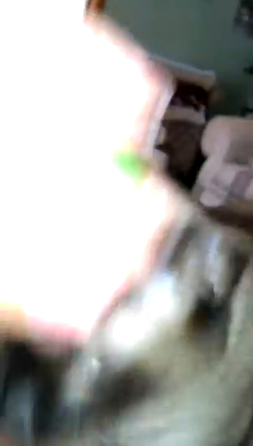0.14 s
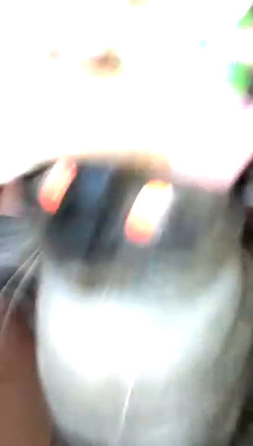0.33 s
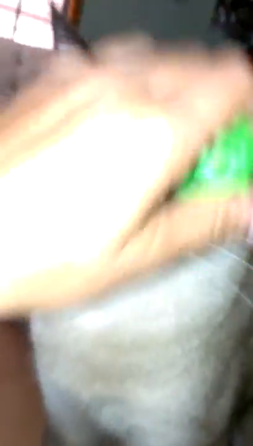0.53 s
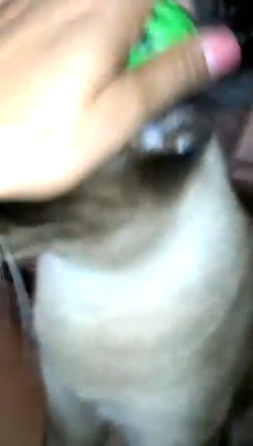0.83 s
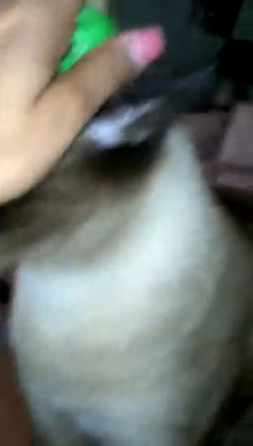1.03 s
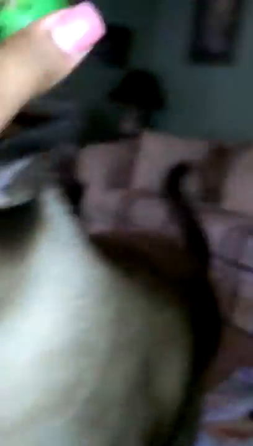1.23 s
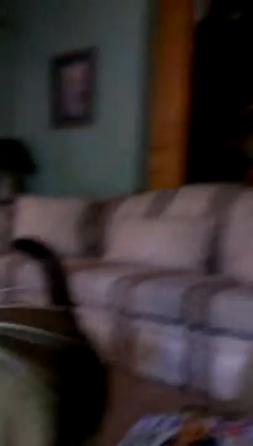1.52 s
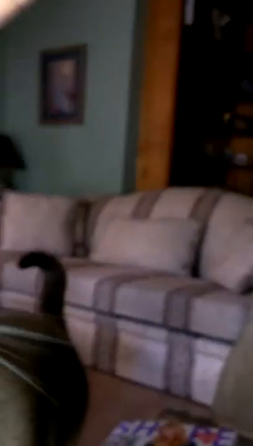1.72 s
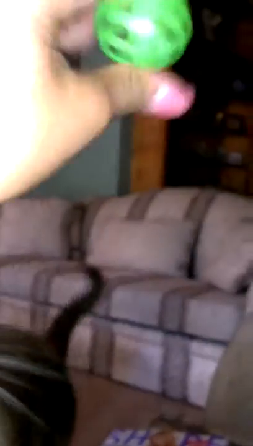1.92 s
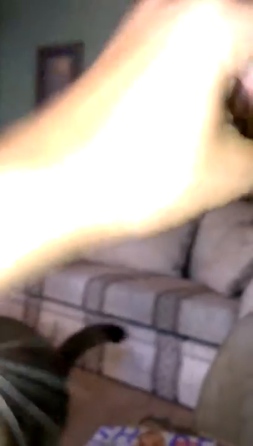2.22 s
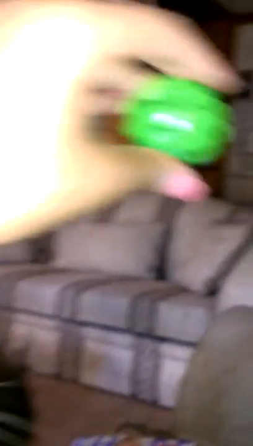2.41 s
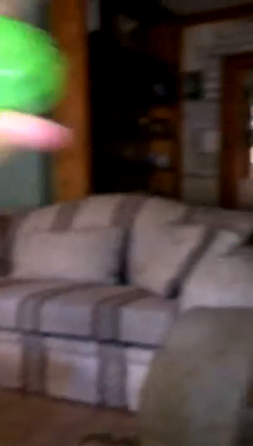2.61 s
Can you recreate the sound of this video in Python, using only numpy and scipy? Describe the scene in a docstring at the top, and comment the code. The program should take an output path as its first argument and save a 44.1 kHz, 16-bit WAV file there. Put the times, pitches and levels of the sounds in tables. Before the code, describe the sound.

A small damped bell in a hollow plastic ball jingles close by, sparse at first, then in denser, louder bursts with light plastic clicks, in a quiet furnished living room, picked up by a phone.

```python
"""A small bell loose inside a slotted plastic ball is shaken in bursts close to a phone in a quiet living room.
The pellet strikes the damped bell (short ringing modes and ticks) and small rattles fill the gaps.
The bell knocks and skids on the plastic shell (shell modes, ticks and sliding hiss).
A faint treble hiss flickers and uneven low noise swells and sinks through the shaking.
The room answers with a brief noise tail over a low room tone."""
import sys
import numpy as np
from scipy import signal
from scipy.fft import rfft, irfft
from scipy.io import wavfile

SR = 44100
rng = np.random.default_rng(int(sys.argv[2]) if len(sys.argv) > 2 else 0)


def voltage_ratio(decibels):
    """Convert decibels (scalar or array-like) to amplitude ratios, 20 dB per decade."""
    exponent = np.asarray(decibels, float) / 20
    return 10 ** exponent


def int16_out(signal):
    """Quantize to a 16-bit WAV file."""
    q = np.round(np.clip(np.atleast_2d(signal).T, -1, 1) * 32767)
    wavfile.write(sys.argv[1], SR, q.astype(np.int16))


N = 121275  # length in samples

# settings shared by several layers
BELL_FAVOUR_HZ, BELL_DETUNE = 260, 0.0051  # width of a blow's favour; relative scatter of the modes
SHELL_FAVOUR_HZ, SHELL_DETUNE, SHELL_T60_S = 890, 0.03, 0.0079
STRIKE_HOLD_S, STRIKE_LEAD_S = 0.017, 0.0026  # how the stir of the strikes fades and builds
KNOCK_HOLD_S, KNOCK_LEAD_S = 0.014, 0.0069  # the same for the knocks
LAYERS_UNTIL_S = 2.63  # chance contacts stop here and the treble hiss starts to fade


def level(x, db):
    """Scale to an rms level."""
    return x * voltage_ratio(db) / np.sqrt(np.mean(x ** 2))


def band(x, lo_hz, hi_hz):
    """Second-order band-pass."""
    return signal.sosfilt(signal.butter(2, [lo_hz, hi_hz], "band", fs=SR, output="sos"), x)


def ring(times, peak_db, modes, favoured_hz, width_hz, t60_s, detune):
    """Each blow rings all modes, those near its favoured pitch most, the weak ones most unevenly."""
    contact_s, favour_db, scatter_db = 0.00051, 13, 2
    out = np.zeros(N + SR)
    mode_hz, mode_db, ring_times = np.array(modes, float).T
    t = np.arange(SR // 25) / SR
    chance = rng.standard_normal((len(times), 2, len(mode_hz)))
    rise = 1 - np.exp(-(t / contact_s) ** 2)
    t60_s = np.broadcast_to(t60_s, len(times))
    for start, db, pitch, t60, (uneven, shift) in zip(times, peak_db, favoured_hz, t60_s, chance):
        scatter = scatter_db * uneven * (1 - mode_db / 20)
        favour = favour_db * np.exp(-((mode_hz - pitch) / width_hz) ** 2)
        gain = voltage_ratio(mode_db + scatter + favour)
        mode_t60 = np.clip(ring_times * t60, .002, 1)[:, None]
        fade = np.exp(-np.log(1000) * t / mode_t60)
        hz = (mode_hz * (1 + detune * shift))[:, None]
        blow = rise * (gain @ (fade * np.sin(2 * np.pi * hz * t)))
        i = max(int(start * SR), 0)
        out[i:i + len(t)] += blow * voltage_ratio(db) / np.abs(blow).max()
    return out[:N]


def ticks(times, db):
    """Broad short cracks of hard contact: treble noise in decaying puffs."""
    decay_s = 0.0011
    kicks = np.zeros(N)
    np.add.at(kicks, np.clip((times * SR).astype(int), 0, N - 1), voltage_ratio(db))
    puffs = signal.lfilter([1], [1, -np.exp(-1 / (decay_s * SR))], kicks)
    return puffs * band(rng.standard_normal(N), 7500, 12700)


def stir(table, hold_s, lead_s):
    """How strongly the ball is astir: the blows of a table, building over lead_s and fading over hold_s."""
    t = np.arange(-SR // 4, SR // 4 + 1) / SR
    blows = np.array(table).T
    power = np.bincount((blows[0] * SR).astype(int), voltage_ratio(2 * blows[1]), N)
    swell = np.exp(-2 * np.maximum(t / hold_s, -t / lead_s))
    return np.sqrt(np.abs(signal.fftconvolve(power, swell, "same")))


def chance_contacts(per_s, strength):
    """Random times, levels in dB that follow the strength, and a spare draw from 0 to 1."""
    spread_db = 2.5
    draws = rng.random((2500, 3))
    times = np.cumsum(-np.log(1 - draws[:, 0])) / per_s
    keep = times < min(LAYERS_UNTIL_S, N / SR)
    times, draws = times[keep], draws[keep]
    db = 20 * np.log10(strength[(times * SR).astype(int)] + 1e-9)
    return times, db - spread_db * np.log(1 - draws[:, 1]), draws[:, 2]


# strikes of the pellet on the bell: start_s [s], level_db [dB, peak of the ringing],
# pitch_hz [Hz, favoured by the strike], t60_s [s, ring left by the grip of the shell]
BELL_STRIKES = [(0.025, -19, 6530, 0.0022), (0.039, -33, 6150, 0.009), (0.053, -28.5, 6530, 0.0023),
                (0.1221, -35, 6900, 0.029), (0.1444, -25, 6700, 0.013), (0.1494, -20.5, 6550, 0.0036),
                (0.185, -34.5, 6940, 0.021), (0.2199, -19.5, 6690, 0.0095), (0.2442, -24, 6750, 0.012),
                (0.2512, -22, 6750, 0.0012), (0.2672, -15.5, 7130, 0.0045), (0.2837, -23, 6600, 0.003),
                (0.3264, -40, 6860, 0.0056), (0.4046, -29, 7080, 0.0091), (0.4325, -34.5, 6800, 0.0075),
                (0.4636, -13, 6780, 0.013), (0.472, -27, 6780, 0.014), (0.484, -33, 7900, 0.012),
                (0.4896, -13, 6700, 0.012), (0.494, -27, 6850, 0.0085), (0.5043, -23, 6800, 0.0084),
                (0.5603, -15.5, 6640, 0.016), (0.5652, -16, 7000, 0.004), (0.5981, -26.5, 6530, 0.011),
                (0.6324, -27, 7250, 0.019), (0.64, -22.5, 6800, 0.0098), (0.686, -33, 6680.0, 0.0034),
                (0.7742, -15, 6630, 0.0089), (0.832, -39.5, 6740, 0.069), (0.8694, -23, 7200, 0.0049),
                (0.874, -24.5, 6470, 0.0088), (0.8866, -17.5, 6600, 0.0044), (0.893, -18.5, 6700, 0.0068),
                (0.9013, -21, 6760, 0.0024), (0.961, -21.0, 6870.0, 0.0088), (0.972, -13, 7100, 0.0037),
                (0.9935, -21.5, 6560, 0.016), (1.001, -17.5, 7100, 0.0073), (1.0099, -16.5, 7100, 0.015),
                (1.0167, -21, 6800, 0.012), (1.0217, -12.5, 6780, 0.019), (1.0267, -18.5, 6770, 0.011),
                (1.0484, -17.5, 6760, 0.013), (1.056, -25, 6700, 0.011), (1.0906, -20, 6800, 0.015),
                (1.0954, -28, 6800, 0.023), (1.1131, -19.5, 6770, 0.025), (1.1159, -19.5, 7880, 0.016),
                (1.1248, -20, 6850, 0.017), (1.1319, -18.5, 6770.0, 0.011), (1.1405, -12.5, 6780, 0.013),
                (1.1485, -26, 6830, 0.01), (1.1596, -26, 6570, 0.038), (1.284, -33, 7000, 0.0087),
                (1.3075, -22, 7060, 0.019), (1.4132, -29.5, 6950, 0.021), (1.42, -33, 7070, 0.017),
                (1.4288, -28, 6900, 0.014), (1.5007, -25.5, 6660, 0.0014), (1.5328, -11, 7030, 0.015),
                (1.5358, -21, 6500, 0.015), (1.539, -24.5, 6760, 0.046), (1.562, -17, 6800, 0.012),
                (1.568, -8, 7230, 0.01), (1.6357, -15.5, 7050, 0.0071), (1.6556, -13, 7040, 0.012),
                (1.67, -19, 7500, 0.0086), (1.6793, -28, 7000, 0.018), (1.6863, -15, 7100, 0.017),
                (1.7177, -20.5, 6800, 0.016), (1.7223, -11, 6670, 0.013), (1.7567, -17, 7140, 0.0064),
                (1.779, -17, 7100, 0.011), (1.7836, -11.5, 7060, 0.018), (1.7877, -12.5, 7000, 0.015),
                (1.8083, -19.5, 7150, 0.011), (1.826, -23.5, 7000, 0.0099), (1.8631, -26.5, 7050, 0.023),
                (1.8952, -9, 6960, 0.0088), (1.899, -14.5, 6940.0, 0.012), (1.9064, -17, 7140, 0.0065),
                (1.9368, -17, 6780, 0.023), (1.9512, -13, 7330, 0.012), (1.9602, -24.5, 6920.0, 0.0084),
                (1.964, -12.5, 7040, 0.0093), (1.9709, -8, 6930, 0.01), (1.987, -17, 6660, 0.051),
                (2.008, -18.5, 6980, 0.022), (2.0213, -26, 6740, 0.019), (2.092, -20, 6740, 0.014),
                (2.1112, -15.5, 6700, 0.013), (2.121, -12.5, 6840, 0.015), (2.1252, -21, 6800, 0.011),
                (2.137, -23.5, 6660, 0.048), (2.1435, -16, 6770.0, 0.016), (2.1566, -20, 6600, 0.043),
                (2.1711, -18, 6560, 0.026), (2.192, -25.5, 7100, 0.037), (2.2046, -11.5, 6400, 0.0011),
                (2.2067, -28, 6570, 0.0094), (2.2165, -18.5, 6800, 0.0076), (2.2192, -25, 6550, 0.021),
                (2.2295, -17.5, 7000.0, 0.0071), (2.2364, -24, 7260, 0.0026), (2.2697, -33, 7080.0, 0.029),
                (2.3109, -30, 7340, 0.0052), (2.335, -20, 7210, 0.011), (2.3806, -13, 8030, 0.0086),
                (2.385, -26.5, 6880.0, 0.022), (2.4043, -25, 7260, 0.0086), (2.4102, -17.5, 6260, 0.0075),
                (2.4131, -25.5, 7100, 0.035), (2.4186, -17.5, 6470, 0.0025), (2.4276, -13, 7060, 0.0032),
                (2.455, -26, 6640, 0.033), (2.4606, -15, 6850, 0.0037), (2.4744, -14.5, 6700, 0.0041),
                (2.4963, -19.5, 6620, 0.011), (2.5745, -30.5, 6700, 0.0054), (2.598, -31, 7100, 0.011),
                (2.6058, -30.5, 7500, 0.0065), (2.6152, -26.5, 7400, 0.0029)]
# modes of the bell: pitch_hz [Hz], level_db [dB, relative], ring_x [multiple of the blow's t60]
BELL_MODES = [(6220, -8, .6), (6770, -2.5, 1.5), (7005, -7.5, 1.0), (7340, -11, .6), (7880, -9.5, 1.5),
              (8590, -10, .4), (9200, -16.5, 1.1)]


def strikes():
    """The pellet hits the bell: damped modes ring behind a hard tick."""
    start_s, level_db, pitch_hz, t60_s = np.array(BELL_STRIKES).T
    ringing = ring(start_s, level_db, BELL_MODES, pitch_hz, BELL_FAVOUR_HZ, t60_s, BELL_DETUNE)
    return ringing + ticks(start_s, level_db - 28.5)


def rattle():
    """The pellet rolls and bounces around the strikes: many chance blows ring the bell faintly."""
    per_s, below_strikes_db, t60_s = 550, -23, 0.013
    strength = stir(BELL_STRIKES, STRIKE_HOLD_S, STRIKE_LEAD_S) * voltage_ratio(below_strikes_db)
    times, db, chance = chance_contacts(per_s, strength)
    pitch_hz = 6500 + 600 * chance
    ringing = ring(times, db, BELL_MODES, pitch_hz, BELL_FAVOUR_HZ, t60_s, BELL_DETUNE)
    return ringing + ticks(times, db - 27.5)


# knocks of the bell on the shell: start_s [s], level_db [dB, peak of the ringing],
# pitch_hz [Hz, favoured by the knock], crack_db [dB, crack over the knock]
SHELL_KNOCKS = [(0.2653, -46, 4440, -12), (0.4629, -52, 3680, -20), (0.5617, -41.5, 3520, -18),
                (0.854, -46.5, 3400, -20), (0.8734, -39, 3760, -22), (0.8915, -37.5, 4360, 11),
                (0.9698, -35.5, 3330, -8), (0.9974, -30, 3900, -13), (1.0113, -34, 3780, -13),
                (1.0167, -33.5, 3870, -7), (1.1127, -36, 3550, -11), (1.1312, -36.5, 3950, -16),
                (1.1379, -36, 4000, -7), (1.1415, -42.5, 3970, -20), (1.4993, -49.5, 3600.0, 10),
                (1.5335, -45, 4900, -4), (1.5377, -47, 4330, 17.5), (1.685, -50, 4650.0, 10),
                (1.7217, -40.5, 4600, -8), (1.9505, -30, 4330, -7), (1.97, -45, 4130.0, 0),
                (1.9944, -39.5, 4400, 4), (2.0077, -37.5, 4540, 7), (2.1122, -34, 4630, -17),
                (2.1421, -34, 4850, -22), (2.193, -28, 4650, -24), (2.2054, -27, 4280, 0.5),
                (2.2173, -45, 4200, 1), (2.2246, -36, 4360.0, 1), (2.325, -43, 4600.0, 2),
                (2.411, -38.5, 4640, 6), (2.449, -44.5, 4850, -10.5)]
# modes of the shell: pitch_hz [Hz], level_db [dB, relative], ring_x [multiple of SHELL_T60_S]
SHELL_MODES = [(1822, -9, 1.1), (2763, -4, 1.1), (3400, -6, 1.3), (4000, -11.5, 2.4), (4287, -6, 1.6),
               (4870, 8, .7), (5300, -14.5, .6)]


def knocks():
    """The bell hits the plastic shell: short modes and a crack of its own level."""
    start_s, level_db, pitch_hz, crack_db = np.array(SHELL_KNOCKS).T
    ringing = ring(start_s, level_db, SHELL_MODES, pitch_hz, SHELL_FAVOUR_HZ, SHELL_T60_S, SHELL_DETUNE)
    return ringing + ticks(start_s, level_db + crack_db)


def scrape():
    """The bell skids along the ribs of the shell around the knocks, and faintly around every strike."""
    per_s, below_knocks_db, below_strikes_db = 850, -16, -46
    strength = stir(SHELL_KNOCKS, KNOCK_HOLD_S, KNOCK_LEAD_S) * voltage_ratio(below_knocks_db)
    strength += stir(BELL_STRIKES, STRIKE_HOLD_S, STRIKE_LEAD_S) * voltage_ratio(below_strikes_db)
    times, db, chance = chance_contacts(per_s, strength)
    pitch_hz = 3000 + 2300 * chance
    ringing = ring(times, db, SHELL_MODES, pitch_hz, SHELL_FAVOUR_HZ, SHELL_T60_S, SHELL_DETUNE)
    return ringing + ticks(times, db - 12)


def grit():
    """Fine sliding hiss of metal on plastic while the bell skids: broad noise that follows the knocks."""
    below_knocks_db = -23.5
    hiss = level(band(rng.standard_normal(N), 2500, 14000), below_knocks_db)
    return hiss * stir(SHELL_KNOCKS, KNOCK_HOLD_S, KNOCK_LEAD_S)


def treble_hiss():
    """A faint broad flickering hiss between about 5.3 and 8.3 kHz, fading out near the end."""
    lo_hz, hi_hz, flicker_db, fade_s = 5300, 8260, 3.2, 0.055
    fade = np.clip((LAYERS_UNTIL_S - np.arange(N) / SR) / fade_s + 1, 0, 1)
    flicker = voltage_ratio(flicker_db * level(band(rng.standard_normal(N), 22, 40), 0))
    hiss = band(rng.standard_normal(N), lo_hz, hi_hz) * flicker
    return level(band(hiss, lo_hz, hi_hz), -62.5) * fade


# contour of the low noise: time_s [s], level_db [dB]
LOW_NOISE_CONTOUR = [(0, -63), (.1, -74.5), (0.149, -60.5), (.35, -70), (.49, -62), (.72, -71.5),
                     (.84, -62), (1.15, -66), (1.22, -71), (1.46, -74.5), (1.52, -65.5), (1.75, -63.5),
                     (1.9, -75.5), (2.0, -61), (2.11, -71), (2.2, -57), (2.3, -71.5), (2.46, -61.5),
                     (2.56, -73.5)]


def low_noise():
    """Low noise swells and sinks through the shaking: three bands, each uneven in its own way."""
    flutter_db = 2.5
    edges_hz = np.geomspace(133.5, 1133, 4)
    out = np.zeros(N)
    for lo, hi in zip(edges_hz, edges_hz[1:]):
        flutter = voltage_ratio(flutter_db * level(band(rng.standard_normal(N), 3.8, 25), 0))
        out += level(band(rng.standard_normal(N), lo, hi), 0) * flutter
    time_s, level_db = np.array(LOW_NOISE_CONTOUR).T
    return level(out, 0) * voltage_ratio(np.interp(np.arange(N) / SR, time_s, level_db))


def room(x):
    """Diffuse echoes of furnished walls: a decaying noise tail that fades in after a short gap."""
    t60_s, tail_db, gap_s = 0.36, -16.5, 0.0024
    t = np.arange(SR // 2) / SR
    tail = rng.standard_normal(len(t)) * voltage_ratio(-60 * t / t60_s) * np.clip(t / gap_s - 1, 0, 1)
    tail *= voltage_ratio(tail_db) / np.sqrt(np.sum(tail ** 2))
    return signal.fftconvolve(x, tail)[:N]


# spectrum of the room tone: pitch_hz [Hz], density_db [dB per Hz, relative]
ROOM_TONE = [(35, -27), (70, -15.5), (130, -22), (280, 0.5), (520, -9.5), (900, -11.5), (1600, -12),
             (3500, -15), (5000, -15.5), (5600, -6), (8000, -24.5), (9000, -14), (15500, -19.5)]


def tone():
    """Steady room tone and microphone hiss: noise shaped in frequency."""
    hz = np.fft.rfftfreq(N, 1 / SR) + 1
    pitch_hz, density_db = np.array(ROOM_TONE).T
    shape = voltage_ratio(np.interp(np.log(hz), np.log(pitch_hz), density_db))
    return level(irfft(rfft(rng.standard_normal(N)) * shape, N), -65.5)


def scene():
    """Ball and treble hiss, their echo in the room, low noise and room tone."""
    near = strikes() + rattle() + knocks() + scrape() + grit() + treble_hiss()
    return (near + room(near) + low_noise() + tone())[None]


def roll_off(x):
    """The treble ends steeply here."""
    return signal.sosfilt(signal.butter(12, 16500, fs=SR, output="sos"), x)


def record(dry):
    """The phone cuts the top with a steep low-pass at 15850 Hz."""
    low_pass = signal.ellip(8, .2, 45, 15850, fs=SR, output="sos")
    finished = signal.sosfilt(low_pass, dry)
    return roll_off(finished)


dry = scene()
out = record(dry)
int16_out(out)
```